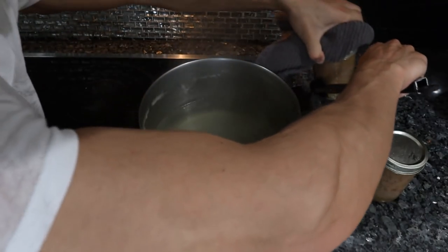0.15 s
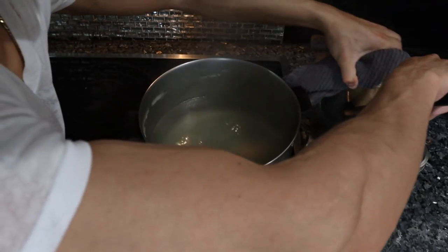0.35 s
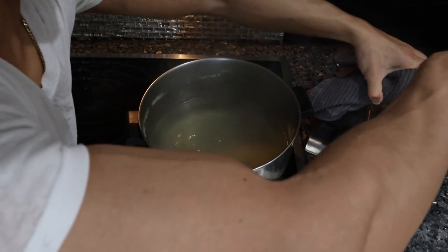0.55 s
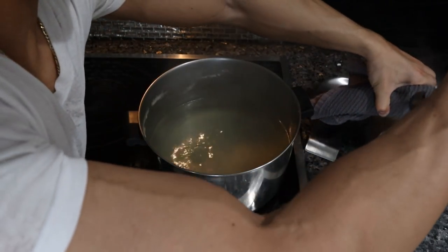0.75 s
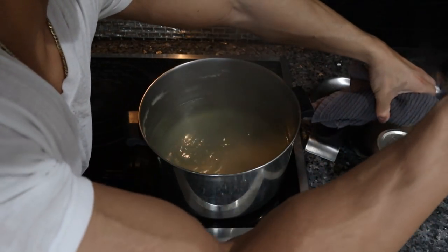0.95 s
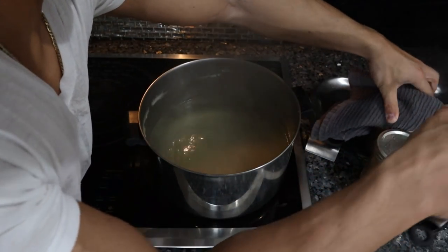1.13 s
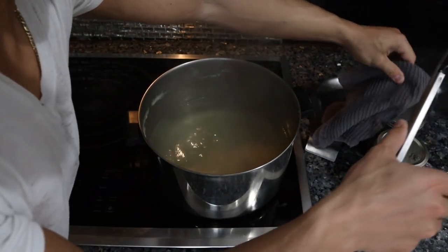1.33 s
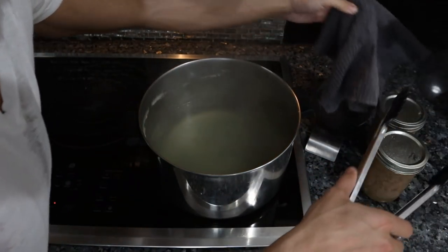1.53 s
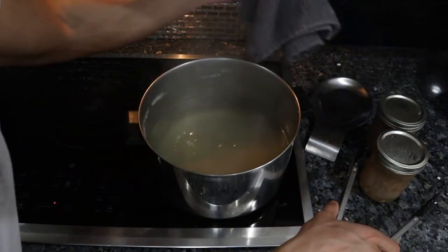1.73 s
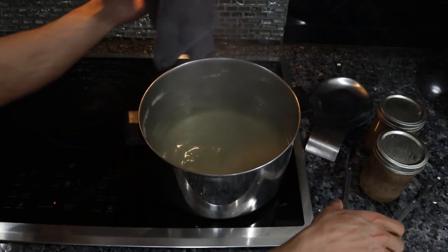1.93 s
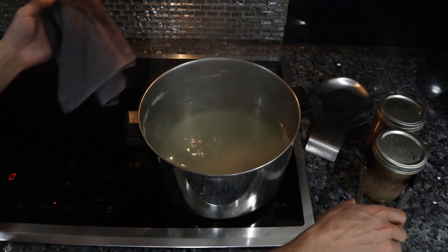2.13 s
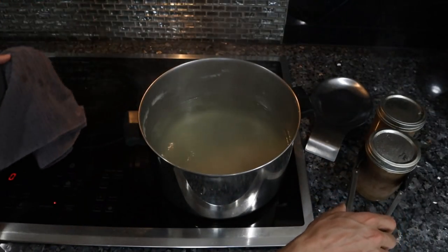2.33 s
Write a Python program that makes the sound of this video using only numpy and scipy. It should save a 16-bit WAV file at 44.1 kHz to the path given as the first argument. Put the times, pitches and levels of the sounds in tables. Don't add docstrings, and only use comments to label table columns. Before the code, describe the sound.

A full glass jar knocks down twice on a stone counter, then steel tongs clank down

```python
import sys
import numpy as np
from scipy import signal
from scipy.fft import rfft, irfft
from scipy.io import wavfile
from scipy.ndimage import uniform_filter1d

SR = 44100
rng = np.random.default_rng(int(sys.argv[2]) if len(sys.argv) > 2 else 0)


def persist_wave(psi):
    counts = np.round(np.clip(psi, -1, 1) * 32767).astype(np.int16)
    wavfile.write(sys.argv[1], SR, np.atleast_2d(counts).T)


def voltage_ratio(decibels):
    exponent = np.asarray(decibels, float) / 20
    return 10 ** exponent


N = 104693

# (frequency [Hz], density [dB per Hz])
SIMMER_SPECTRUM = [(40, -13.5), (263, -6), (600, -13), (1100, -19), (2500, -20), (6800, -28.5), (7800, -40),
                   (15500, -41.5)]

# (time [s], peak level [dB], push [ms], chatter [ms], chatter level [dB])
TICK_BLOWS = [
    (.009, -34, 0.017, 2.9, 9),
    (.478, -59, 0.33, 5.4, -5),
]
# (frequency [Hz], width [Hz], level [dB])
TICK_MODES = [(4580, 200, -19), (5320, 12, -3), (5800, 200, -8), (6200, 170, -1), (6540, 120, 5),
              (6400, 5.8, 7.5), (6640, 12, 6), (8000, 300, -16), (8670, 160, -14), (11400, 200, -22),
              (12700, 300, -15), (15400, 300, -16)]
# (time [s], peak level [dB], push [ms], chatter [ms], chatter level [dB])
TING_BLOWS = [
    (.126, -34, 0.01, 4.2, 7.5),
    (.195, -57, 0.023, 3, 4),
]
# (frequency [Hz], width [Hz], level [dB])
TING_MODES = [(5327, 23, 3), (6330, 360, -1.5), (6630, 77, 12), (6520, 10, 3), (6500, 17, 4),
              (7800, 400, -13), (9400, 300, -22), (11660, 180, -5), (11600, 12, -4), (13000, 300, -25),
              (14540, 200, -16), (15400, 60, -12)]
# (time [s], peak level [dB], push [ms], chatter [ms], chatter level [dB])
RATTLE_BLOWS = [
    (2.1455, -10.5, 0.028, 1.9, 7),
    (2.148, -15, 0.039, 1.2, -3),
    (2.167, -12.5, 0.042, 0.43, -11.5),
]
# (frequency [Hz], width [Hz], level [dB])
RATTLE_MODES = [(910, 190, -17.5), (1920, 194, 4.5), (2250, 290, 1), (2760, 240, -2.5), (3840, 180, -17),
                (5080, 370, -24.5), (6460, 1200, -17.5), (7600, 800, -23.5), (10300, 2400, -26),
                (13900, 1000, -31)]
# (time [s], peak level [dB], push [ms], chatter [ms], chatter level [dB])
DROP_BLOWS = [
    (2.185, 1, 0.028, 1.66, -3),
    (2.189, -8.5, 0.023, 2.4, 6),
    (2.193, -13, 0.048, 2, 0),
    (2.1965, -6.5, 0.036, 1.2, 6),
    (2.1992, -10, 0.022, 2.3, -1),
    (2.2035, -15, 0.033, 6.1, 2),
    (2.212, -26, 0.021, 2.5, 8),
]
# (frequency [Hz], width [Hz], level [dB])
DROP_MODES = [(1728, 422, 4), (2220, 355, 7), (2720, 480, -3), (3950, 500, -7), (4480, 400, -8),
              (5010, 470, -6), (5890, 580, -11.5), (8400, 1400, -21.5), (9640, 1200, -23.5),
              (14000, 2500, -30.5)]

# (frequency [Hz], 60 dB decay [s], level [dB])
ROOM_BANDS = [(103, 0.6, -2), (293, 0.47, 4.5), (756, 0.3, 3.5), (1600, 0.5, 3), (3020, 0.4, 1),
              (5900, 0.462, -0.5), (12000, 0.18, 10.5)]

SQUEAK_STARTS = [.815, 1.8, 2.295, .81, .96, .62, 1.63, 1.25, 2.06, 2.2, .66, 1.85, .4]
SQUEAK_PITCHES = [4500, 2500, 11400, 7000, 1500, 2000, 4350, 8300, 3000, 600, 550, 6900, 6900]
# (length [s], width [Hz], level [dB])
SQUEAK_SHAPES = [(0.076, 280, -58.5), (0.13, 510, -62), (0.049, 200, -74), (0.078, 4200, -65),
                 (0.06, 3700, -52.5), (0.098, 2400, -50), (0.15, 150, -59.5), (0.078, 2200, -60.5),
                 (0.33, 2100, -53), (0.23, 1500, -53), (0.26, 99, -59), (0.26, 130, -71.5),
                 (0.53, 89, -77.5)]

# (time [s], peak level [dB], push [ms], chatter [ms], chatter level [dB])
THUD_BLOWS = [
    (.5, -53, 1.5, 18, 4),
    (.655, -43, 0.28, 21, 26),
    (1.006, -23.5, 1, 7.9, 4.5),
    (1.182, -23, 1.3, 7.2, -27),
    (1.295, -32.5, 0.46, 7.1, -5),
    (1.545, -43.5, 2.5, 9.1, -16),
    (2.16, -42.5, 2.4, 5.9, -8),
    (2.19, -37, 0.6, 10, -28),
    (2.35, -41, 5.9, 12, -36),
]
# (frequency [Hz], width [Hz], level [dB])
COUNTER_MODES = [(64.6, 25, -3), (136, 69, 3.5), (273, 34, 6)]

# (time [s], peak level [dB], push [ms], chatter [ms], chatter level [dB])
NUDGE_BLOWS = [
    (.652, -20.5, 0.023, 6, 0),
]
# (frequency [Hz], width [Hz], level [dB])
NUDGE_MODES = [(248, 240, -9.5), (660, 210, 5.5), (1114, 280, 4), (1668, 150, 6), (1850, 1000, -21.5),
               (2245, 150, 4.5), (3290, 370, -35.5)]
# (time [s], peak level [dB], push [ms], chatter [ms], chatter level [dB])
GRIP_BLOWS = [
    (.652, -26.5, 0.022, 5, 8.5),
    (.668, -21, 0.01, 2.67, 7.2),
]
# (frequency [Hz], width [Hz], level [dB])
GRIP_MODES = [(1747, 360, -3.5), (2180, 530, -5), (3260, 350, -6.5), (5540, 225, -6), (6940, 480, -23.5),
              (8820, 760, -28)]
# (time [s], peak level [dB], push [ms], chatter [ms], chatter level
# [dB])
BROAD_BLOWS = [
    (.6525, -26, 0.046, 5, 7),
    (1.0053, -3.5, .06, 0.87, 2.4),
    (1.009, -12, 0.042, 3.7, 6),
    (1.1805, -7.5, .05, 4.3, 8),
    (1.187, -12, 0.042, 6, 6),
]
# (frequency [Hz], width [Hz], level [dB])
BROAD_MODES = [(650, 350, -0.5), (1700, 1600, -4.5), (3100, 900, -9.5), (4400, 1400, -24)]
# (time [s], peak level [dB], push [ms], chatter [ms], chatter level [dB])
HEEL_BLOWS = [
    (1.0051, 4.5, 0.055, 1.8, -6.5),
    (1.0095, -4, 0.07, 6.7, 3),
]
# (frequency [Hz], width [Hz], level [dB])
HEEL_MODES = [(323, 66, -5), (468.5, 103, -3.5), (697, 140, -1), (940, 300, -4), (1191, 140, 0),
              (1418, 120, -7.5), (1500, 100, -1.5), (1877, 120, -4.5), (2226, 200, -3), (2814, 130, -10),
              (3500, 190, -11), (3770, 100, -23.5), (4930, 220, -19), (5625, 770, -27.5)]
# (time [s], peak level [dB], push [ms], chatter [ms], chatter level [dB])
RIM_BLOWS = [
    (1.0052, -39, 0.0091, 0.92, 1),
    (1.1802, -24, 0.023, 5.7, 0),
]
# (frequency [Hz], width [Hz], level [dB])
RIM_MODES = [(4890, 230, -15), (5970, 780, -10), (6970, 54, -2.5), (7300, 400, -12), (8940, 160, -8.5),
             (9400, 660, -15), (11500, 550, -12), (14000, 1500, -20)]
# (time [s], peak level [dB], push [ms], chatter [ms], chatter level [dB])
TOE_BLOWS = [
    (1.179, -12, 0.06, 1.3, -20),
    (1.1802, -1.5, 0.061, 4.6, 11),
    (1.1865, -7.5, 0.09, 5.4, 5),
    (1.1935, -13.5, 0.058, 3.1, -2.5),
]
# (frequency [Hz], width [Hz], level [dB])
TOE_MODES = [(527, 90, -17), (690, 204, -4), (814, 82, -2.5), (1016, 162, -4), (1246, 190, -2.5),
             (1422, 68, 1.5), (2050, 130, -6), (2256, 150, -7), (2722, 120, 1.5), (3160, 180, -9.5),
             (3390, 80, -6.5), (3600, 75, 0), (3860, 120, -5), (5030, 470, -20.5)]
# (time [s], peak level [dB], push [ms], chatter [ms], chatter level [dB])
HANDLE_BLOWS = [
    (2.15, -29.5, 0.13, 17, 10),
    (2.193, -22.5, 0.16, 16.6, 3),
    (2.352, -35.5, 0.066, 11, 5.6),
]
# (frequency [Hz], width [Hz], level [dB])
HANDLE_MODES = [(442, 430, -12.5), (954, 310, 2.5), (1330, 1060, -1)]

# (time [s], level [dB])
SLIDE_PRESSURE = [(1.2, -89.5), (1.26, -65), (1.36, -55), (1.48, -53.5), (1.58, -60), (1.68, -55),
                  (1.75, -61), (1.79, -63.5), (1.9, -82)]
# (frequency [Hz], width [Hz], level [dB])
SLIDE_MODES = [(2150, 110, -10), (3020, 1200, -23.5), (4286, 200, -16.5), (5920, 1100, -21.5),
               (8640, 2800, -28.5), (12600, 1600, -30.5)]
# (time [s], level [dB])
DRAG_PRESSURE = [(1.3, -55), (1.42, -51.5), (1.55, -49), (1.66, -47.5), (1.76, -52), (1.82, -57)]
# (frequency [Hz], width [Hz], level [dB])
DRAG_MODES = [(268, 44.5, 4), (416, 118, -5.5), (587, 170, -15)]


def band(x, hz, width):
    return signal.lfilter(*signal.iirpeak(min(hz, .45 * SR), hz / max(width, 1), fs=SR), x)


def noise_band(hz, width):
    return unit(band(band(rng.standard_normal(N), hz, width), hz, width))


def unit(x):
    return x / np.sqrt(np.mean(x ** 2))


def walk(rate):
    hold = int(SR / rate)
    steps = np.repeat(rng.standard_normal(N // hold + 1), hold)
    return 1.1 * uniform_filter1d(uniform_filter1d(steps, hold), hold)[:N]


def simmer_and_hum():
    hz_points, db_points = np.array(SIMMER_SPECTRUM).T
    swell = walk(2.9)
    out = 0
    for hz in 30 * 2 ** np.arange(0, 9.1, 1 / 3):
        density_db = np.interp(np.log(hz), np.log(hz_points), db_points)
        db = density_db + 10 * np.log10(hz) + 0.39 * swell + 0.72 * walk(2.7)
        out = out + voltage_ratio(db) * noise_band(hz, hz / 4.3)
    return unit(out) * voltage_ratio(-55.5)


def body(x, modes):
    return sum((-1) ** k * voltage_ratio(db) * band(x, hz, width) for k, (hz, width, db) in enumerate(modes))


def blows(table, modes):
    t = np.arange(SR // 2) / SR
    out = np.zeros(N + len(t))
    for start, db, push_ms, chatter_ms, chatter_db in table:
        push = t * np.exp(-t * 1000 / push_ms)
        age = t * 1000 / chatter_ms
        chatter = rng.standard_normal(len(t)) * age * np.exp(1 - 2 * age)
        chatter = signal.fftconvolve(chatter, push[:SR // 20])[:len(t)]
        push = push / np.sqrt(np.sum(push ** 2))
        chatter = chatter / np.sqrt(np.sum(chatter ** 2))
        ring = body(push + voltage_ratio(chatter_db) * chatter, modes)
        crack = voltage_ratio(-44.5) * band(push, 5000, 9000)
        y = ring + crack
        i = int(start * SR)
        out[i:i + len(t)] += voltage_ratio(db) * y / np.max(np.abs(y))
    return out[:N]


def tongs_on_glass_and_dropped():
    on_glass = blows(TICK_BLOWS, TICK_MODES) + blows(TING_BLOWS, TING_MODES)
    return on_glass + blows(RATTLE_BLOWS, RATTLE_MODES) + blows(DROP_BLOWS, DROP_MODES)


def even(x):
    z = rfft(x)
    power = np.abs(z) ** 2
    hump = np.sqrt(uniform_filter1d(power, size=50)) + 1e-12
    flat = irfft(z / hump * np.sqrt(np.mean(power)), len(x))
    return flat * (np.arange(len(x)) < .75 * len(x))


def kitchen(x):
    gap_s, rise_s = 0.003, 0.0052
    far_wall_s, far_wall_db = 0.041, -10
    t = np.arange(SR) / SR
    rise = 1 - np.exp(-np.clip(t - gap_s, 0, 1) / rise_s)
    rise = rise * (1 + voltage_ratio(far_wall_db) * np.clip((t - far_wall_s) / 0.0065, 0, 1))
    echo = 0
    for hz, t60, db in ROOM_BANDS:
        tail = even(voltage_ratio(db - 60 * t / t60) * rng.standard_normal(SR))
        echo = echo + band(band(tail, hz, hz), hz, hz)
    return voltage_ratio(-10.5) * signal.fftconvolve(x, echo * rise / np.sqrt(0.022 * SR))[:N]


def squeaks_and_brushes(t):
    out = 0
    for start, hz, (length, width, db) in zip(SQUEAK_STARTS, SQUEAK_PITCHES, SQUEAK_SHAPES):
        fade_in = np.clip(4 * (t - start) / length, 0, 1)
        fade_out = np.clip(4 * (start + length - t) / length, 0, 1)
        out = out + voltage_ratio(db + 2 * walk(40)) * fade_in * fade_out * noise_band(hz, width)
    return out


def counter_thuds():
    return blows(THUD_BLOWS, COUNTER_MODES)


def jar_set_down():
    handling = blows(NUDGE_BLOWS, NUDGE_MODES) + blows(GRIP_BLOWS, GRIP_MODES)
    landing = blows(HEEL_BLOWS, HEEL_MODES) + blows(TOE_BLOWS, TOE_MODES)
    return handling + landing + blows(RIM_BLOWS, RIM_MODES) + blows(BROAD_BLOWS, BROAD_MODES)


def rub(t, pressure, modes):
    grit = rng.standard_normal(N) * voltage_ratio(1.5 * walk(60))
    times, levels = np.array(pressure).T
    return unit(body(grit, modes)) * voltage_ratio(np.interp(t, times, levels, left=-120, right=-120))


def tongs_slide_and_cloth_drag(t):
    return rub(t, SLIDE_PRESSURE, SLIDE_MODES) + rub(t, DRAG_PRESSURE, DRAG_MODES)


def handle_knocks():
    return blows(HANDLE_BLOWS, HANDLE_MODES)


def scene():
    t = np.arange(N) / SR
    tongs = tongs_on_glass_and_dropped()
    jar = counter_thuds() + jar_set_down() + handle_knocks()
    jar_to_walls = signal.lfilter(*signal.butter(1, 4500, fs=SR), jar)
    tongs_to_walls = voltage_ratio(-2) * (tongs - 0.62 * band(tongs, 2180, 1600))
    echoes = kitchen(jar_to_walls + tongs_to_walls)
    friction = squeaks_and_brushes(t) + tongs_slide_and_cloth_drag(t)
    return (jar + tongs + echoes + friction + simmer_and_hum())[None]


def roll_off(x):
    return signal.sosfilt(signal.butter(12, 16300, fs=SR, output="sos"), x)


def record(dry):
    thin = signal.sosfilt(signal.butter(2, 46, "high", fs=SR, output="sos"), dry)
    top_cut = signal.ellip(6, .3, 45, 15900, fs=SR, output="sos")
    dull = signal.sosfilt(top_cut, np.clip(thin, -1, 1))
    return roll_off(np.clip(dull, -1, 1))


dry = scene()
out = record(dry)
persist_wave(out)
```